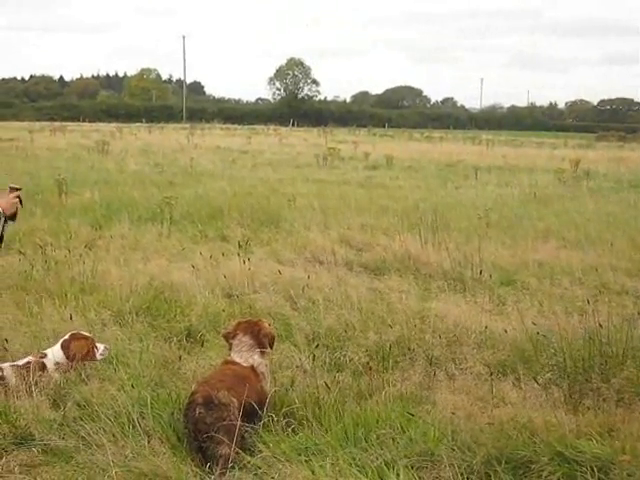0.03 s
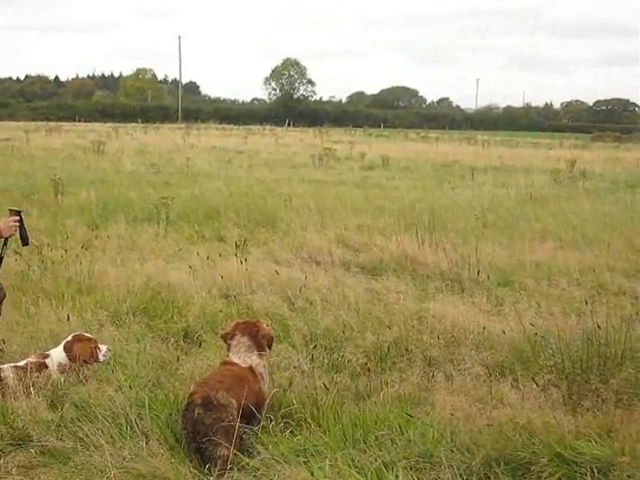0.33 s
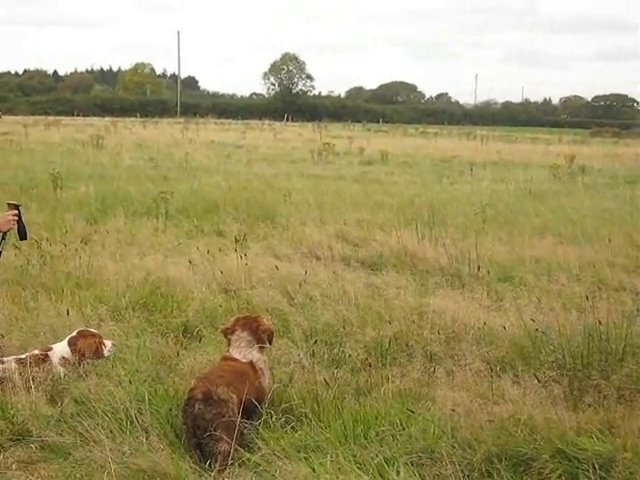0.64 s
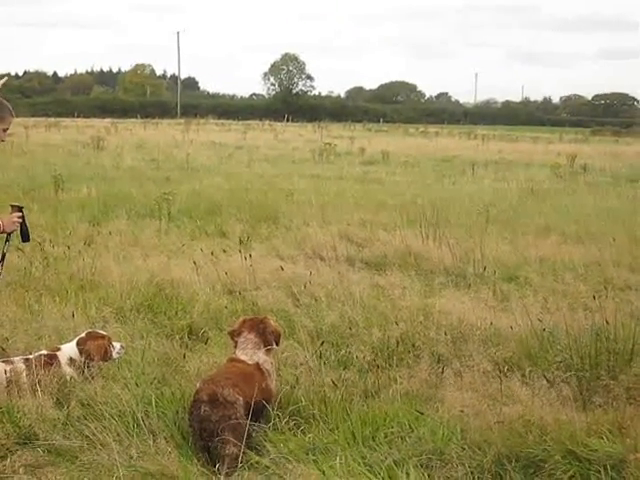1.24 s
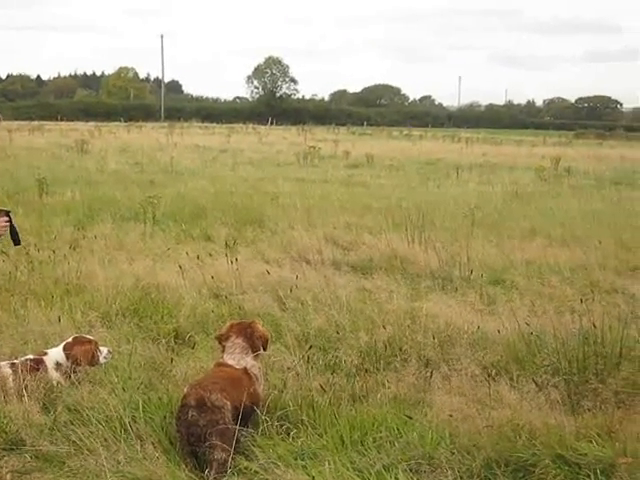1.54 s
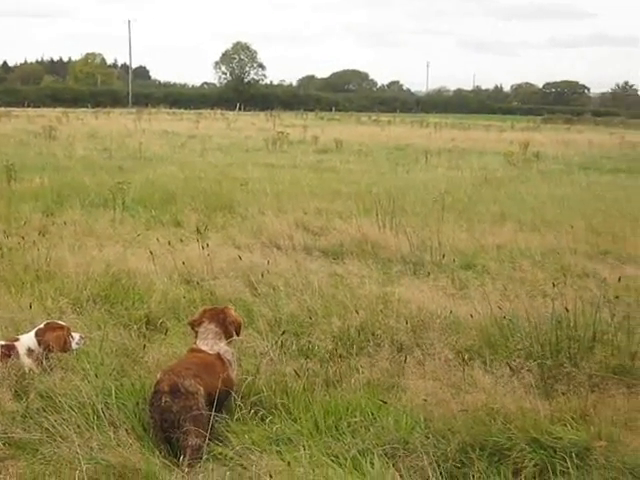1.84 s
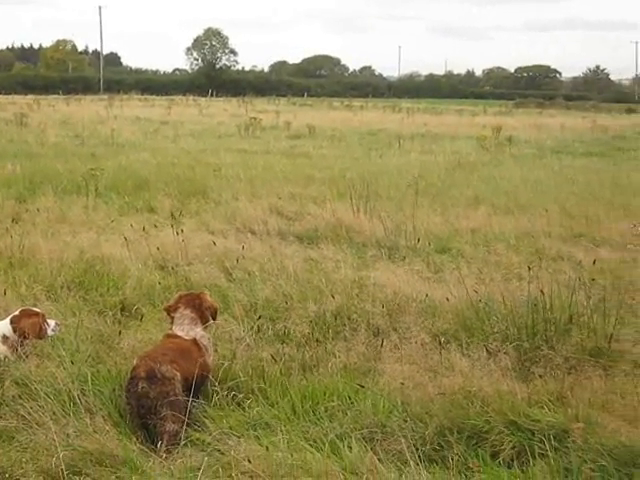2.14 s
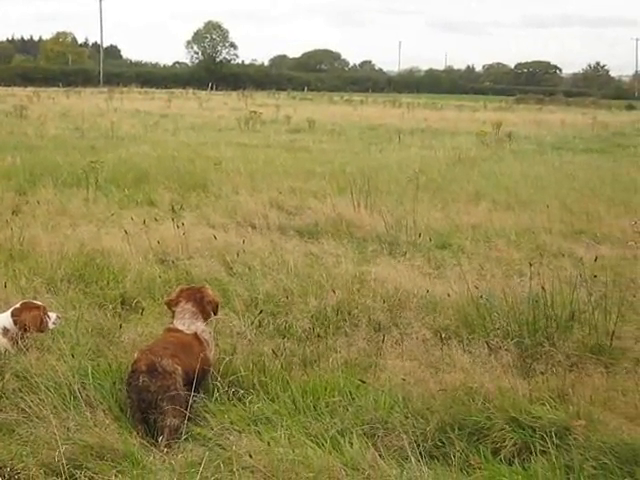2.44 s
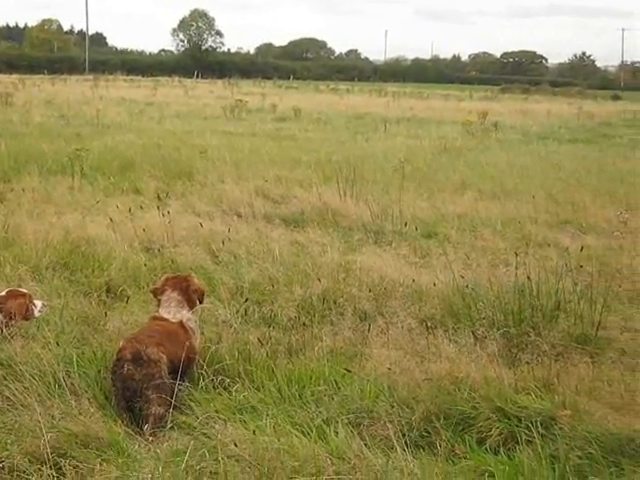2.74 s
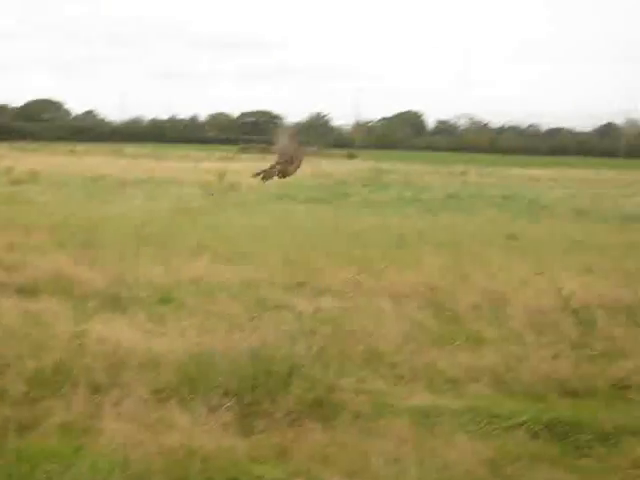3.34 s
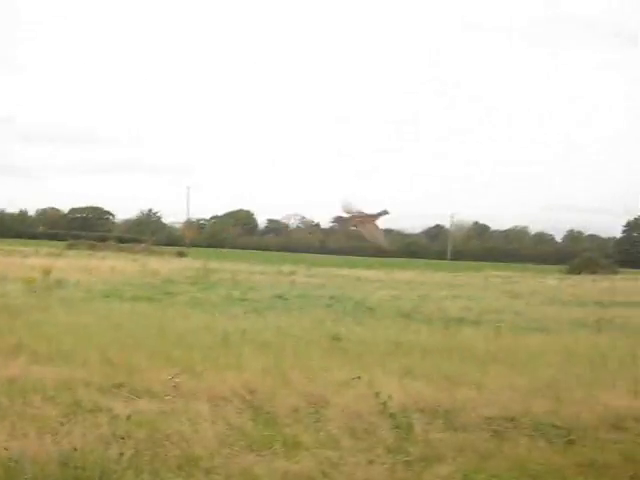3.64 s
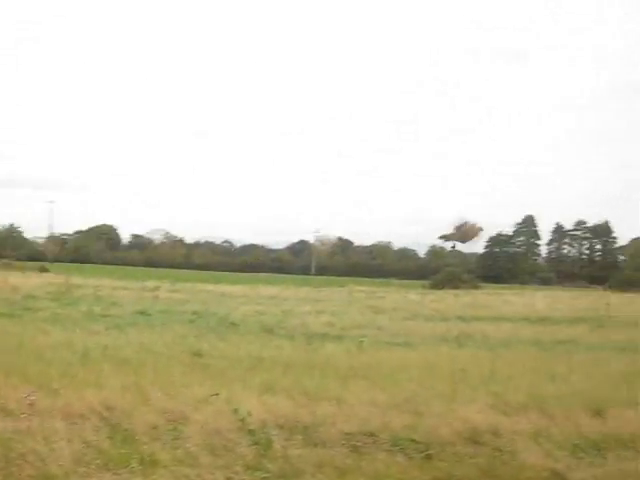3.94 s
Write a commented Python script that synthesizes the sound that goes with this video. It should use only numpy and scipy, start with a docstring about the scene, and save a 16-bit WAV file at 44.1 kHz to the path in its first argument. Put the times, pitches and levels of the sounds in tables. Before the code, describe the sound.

A game bird bursts from grass and whirrs away over a quiet, breezy field.

```python
"""A game bird flushed from grass.

Wind rumbles over a quiet field, a far road murmurs and a small songbird whistles. Near three seconds
a game bird breaks out of the grass: its first strokes slap the stems, then it whirrs away at thirteen
wingbeats a second, each a thump and a swish of displaced air. A small camera with a low sample rate
adds a faint whine, a steady hiss and a gritty top."""
import sys
import numpy as np
from scipy import signal
from scipy.fft import rfft, irfft
from scipy.io import wavfile

SR = 44100
rng = np.random.default_rng(int(sys.argv[2]) if len(sys.argv) > 2 else 0)


def transcribe(signal):
    """Save signal, clipped to [-1, 1], as a 16-bit WAV file at the path in sys.argv[1]."""
    frames = np.atleast_2d(signal).T
    limited = np.clip(frames, -1, 1)
    pcm = np.round(limited * 32767).astype(np.int16)
    wavfile.write(sys.argv[1], SR, pcm)


N = 176400
T = np.arange(N) / SR

# Spectra of the background noises. Each row: frequency in Hz, relative spectral density in dB.
WIND_SPECTRUM = [(15, -10), (28, -13.5), (45, 3), (65, -3), (88, 3.5), (115, -7), (160, -15), (250, -24.5),
                 (500, -31)]
ROAD_SPECTRUM = [(200, -16.5), (350, -15.5), (550, -5.5), (750, -5), (900, 0), (1020, 0), (1250, -7.5),
                 (1700, -19), (3000, -54)]
HISS_SPECTRUM = [(300, 1), (1400, -.5), (2000, -4), (2800, -5.5), (4000, -7.5), (5500, -11)]
# Loudness of the far road. Each row: time in seconds, level in dB.
ROAD_LEVELS = [(0, -46.5), (.45, -47), (.58, -44), (.66, -47.5), (.78, -44), (.95, -46), (1.4, -47.5),
               (2.0, -47), (2.5, -46), (3.0, -47), (4.0, -46)]
# Faint far tones and the songbird's notes. Each row: start in seconds, length in seconds,
# first, middle and last pitch in Hz, level in dB.
FAR_NOTES = [(.03, .23, 335, 322, 300, -54), (.54, .06, 950, 915, 880, -46),
             (.71, .13, 1010, 1035, 990, -47)]
SONG_NOTES = [(.885, 0.017, 4000, 4330, 4660, -48.5), (.9, 0.023, 3914, 3970, 3840, -49.5),
              (.942, .02, 4420, 4050, 3850, -48.5), (.99, 0.019, 4074, 4460, 4940, -47),
              (1.053, 0.017, 3500, 3165, 2970, -48), (1.085, .024, 4235, 3600, 3310, -50.5),
              (1.152, 0.013, 4070, 4220, 4330, -47), (1.238, 0.0268, 4125, 3450, 3000, -50.5),
              (1.304, .02, 3310, 3650, 4280, -49), (1.415, 0.083, 3640, 3630, 3640, -48.5),
              (1.745, 0.058, 3410, 3900, 4057, -44), (1.835, 0.031, 4690, 4640, 4550, -47),
              (1.865, 0.046, 5500, 4780, 5575, -41.5), (1.905, 0.0219, 5375, 5150, 5510, -39.5),
              (1.924, .048, 5300, 4900, 4530, -42), (2.024, 0.019, 4420, 4200, 4200, -47),
              (2.09, 0.058, 3120, 3625, 2690, -42.5), (2.208, 0.026, 4550, 4690, 4480, -49),
              (2.235, 0.096, 4420, 4297, 4270, -43), (2.335, 0.022, 4150, 4380, 4500, -49)]

# The body pushes through grass. Each row: peak time in seconds, level in dB, rise and fall in seconds.
GRASS_BRUSHES = [(2.96, -40.5, 0.0051, 0.014), (2.977, -33.5, .0005, 0.00087), (2.993, -32, 0.013, 0.014),
                 (3.072, -27.5, 0.0031, 0.014), (3.096, -32, 0.00072, 0.0024),
                 (3.1153, -15, 0.00072, 0.00055), (3.139, -39, .001, 0.0024), (3.162, -36.5, .001, .003),
                 (3.237, -37.5, 0.0035, 0.016), (3.541, -35, .005, 0.0038)]
# Rustle of stems and feathers. Each row: time in seconds, level in dB.
RUSTLE_LEVELS = [(2.9, -55.5), (2.97, -46), (3.03, -41.5), (3.1, -39.5), (3.2, -38.5), (3.3, -40),
                 (3.45, -41), (3.58, -41.5), (3.63, -46.5), (3.85, -45), (4.0, -43.5)]
# Spectra of brushing and rustling. Each row: frequency in Hz, relative spectral density in dB.
BRUSH_SPECTRUM = [(200, 2), (600, -10), (1200, -5.5), (2200, -3.5), (3400, -1), (4400, -7), (5500, -7)]
RUSTLE_SPECTRUM = [(150, -2.5), (400, 1.5), (800, 4.5), (1400, 0.5), (2400, 0.5), (3600, -1), (5500, -7.5)]

# Wings strike stems. Each row: start in seconds, strength of the dull smack and the bright crack in dB.
STEM_SLAPS = [(3.042, -16, -36), (3.1046, -20.5, -20), (3.115, -12.5, -34), (3.1162, -3.5, -18),
              (3.1176, -25.5, -15.5), (3.127, -25, -15), (3.1826, -21, -20), (3.1963, -39, -19.5),
              (3.1981, -21, -28), (3.2058, -24, -33)]
# Resonances of a slap. Each row: frequency in Hz, gain in dB, time to decay by 60 dB in seconds.
SMACK_MODES = [(400, -21, 0.017), (870, -10, 0.0056), (1250, -1, 0.0036), (1860, -7, 0.0014)]
CRACK_MODES = [(2280, -9, 0.013), (2550, -1, 0.017)]

# Downstrokes. Each row: peak time in seconds, thump level in dB, thump pitch in Hz,
# thump fall time in seconds, feather swish level in dB.
DOWNSTROKES = [(3.038, -24.5, 588, 0.0029, -37.5), (3.113, -26, 483, 0.0098, -35.5),
               (3.187, -31, 450, 0.0037, -35), (3.264, -24.5, 555, 0.0081, -36),
               (3.3337, -24.5, 556, .0065, -36), (3.409, -18, 430, 0.005, -38),
               (3.483, -28.5, 492, 0.0084, -39), (3.556, -20, 493, 0.0057, -36.5),
               (3.635, -28.5, 430, 0.0038, -37), (3.7097, -22, 555, 0.0031, -42),
               (3.7868, -25, 585, .003, -42), (3.8625, -26.5, 550, 0.0043, -40),
               (3.941, -32, 440, .006, -41)]
# Spectra of the feather swish, the rush of air in the thump and the low push of shoved air.
# Each row: frequency in Hz, relative spectral density in dB.
SWISH_SPECTRUM = [(220, 1.5), (380, 3.5), (700, -1.5), (1200, -2.5), (1900, -1), (2600, -4), (3800, -8),
                  (5500, -12)]
RUSH_SPECTRUM = [(200, -15), (340, -6.5), (450, 6), (620, -8.5), (850, -23.5), (1200, -7), (1600, -14.5)]
PUSH_SPECTRUM = [(25, -3), (45, 3), (90, -1), (130, -6), (180, -15), (250, -36)]


def from_db(db):
    """Amplitude grows tenfold for every 20 dB."""
    return 10 ** (np.asarray(db) / 20)


def level_curve(levels):
    """Gain that moves linearly in decibels between timed levels."""
    return from_db(np.interp(T, *np.transpose(levels)))


def unit_rms(x):
    """Normalisation to unit mean power."""
    return x / np.sqrt(np.mean(x ** 2) + 1e-20)


def filtered(x, kind, hz, order=2):
    """A maximally flat filter passes the "low" or the "high" side of hz."""
    return signal.sosfilt(signal.butter(order, hz, kind, fs=SR, output="sos"), x)


def coloured(x, spectrum):
    """Spectral shaping to unit rms, falling 12 dB an octave above the last point."""
    hz = np.maximum(np.arange(N // 2 + 1) * SR / N, 1)
    points, db = np.transpose(spectrum)
    gain = from_db(np.interp(np.log(hz), np.log(points), db)) / np.maximum(hz / points[-1], 1) ** 2
    return unit_rms(irfft(rfft(x) * gain, N))


def noise(spectrum):
    """White noise takes on the spectrum of its filter."""
    return coloured(rng.standard_normal(N), spectrum)


def drift(rate_hz):
    """Low-passed noise wanders at random with unit rms."""
    hz = np.arange(N // 2 + 1) * SR / N
    return unit_rms(irfft(rfft(rng.standard_normal(N)) / (1 + (hz / rate_hz) ** 2), N))


def swell(peak_s, rise_s, fall_s):
    """A hyperbolic secant envelope: a rounded peak with exponential flanks."""
    t = T - peak_s
    distance = np.abs(t) / np.where(t < 0, rise_s, fall_s)
    return 1 / np.cosh(np.minimum(distance * np.pi / 2, 20))


def whistles(notes):
    """Frequency modulation: each nearly pure note glides through three pitches, wavering slightly."""
    out = np.zeros(N)
    waver = 1 + .004 * drift(89)
    for start, length, first, middle, last, db in notes:
        progress = np.linspace(0, 1, int(length * SR))
        span = slice(int(start * SR), int(start * SR) + len(progress))
        glide = np.polyfit([0, .5, 1], [first, middle, last], 2)
        hz = np.polyval(glide, progress) * waver[span]
        envelope = np.sqrt(np.abs(np.sin(np.pi * progress)))
        out[span] += from_db(db) * envelope * np.sin(2 * np.pi * np.cumsum(hz) / SR)
    return out * from_db(1.5 * drift(44))  # the level flickers


def field():
    """Superposition of wind rumble, the wash of a far road, a light hiss and a few faint far tones."""
    wind = from_db(-41 + .5 * drift(12)) * noise(WIND_SPECTRUM)
    road = level_curve(ROAD_LEVELS) * from_db(.5 * drift(7.3)) * noise(ROAD_SPECTRUM)
    hiss = from_db(-55.3) * noise(HISS_SPECTRUM)
    return wind + road + hiss + whistles(FAR_NOTES)


def songbird(echo_db=-6, echo_rise_s=.02, echo_t60_s=.75):
    """Diffuse reflection from the hedges trails a far song with a thin echo."""
    song = whistles(SONG_NOTES)
    t = T[:SR]
    envelope = from_db(-60 * t / echo_t60_s) * np.minimum(t / echo_rise_s, 1)
    reflections = rng.standard_normal(SR) * envelope
    echo = signal.fftconvolve(song, reflections / np.linalg.norm(reflections))[:N]
    return song + from_db(echo_db) * echo


def stem_ticks(spectrum, ticks_per_s=3500, spread_db=1.5):
    """Shot noise: dry stems tick densely, at random times and with uneven strength."""
    sizes = from_db(spread_db * np.minimum(rng.exponential(1, N), 4))
    signs = rng.choice([-1, 1], N)
    ticking = rng.random(N) < ticks_per_s / SR
    return coloured(sizes * signs * ticking, spectrum)


def grass():
    """Many small contacts merge into noise as stems are brushed aside and rustle under the rising bird."""
    brushes = sum(from_db(db) * swell(peak, rise, fall) for peak, db, rise, fall in GRASS_BRUSHES)
    brushing = brushes * stem_ticks(BRUSH_SPECTRUM)
    rustle = level_curve(RUSTLE_LEVELS) * stem_ticks(RUSTLE_SPECTRUM)
    return brushing + rustle


def ring(impulses, modes):
    """Impulses excite resonant modes, each an exponentially damped sinusoid."""
    out = np.zeros(N)
    for hz, db, t60 in modes:
        radius = from_db(-60 / (t60 * SR))
        angle = 2 * np.pi * hz / SR
        feedback = [1, -2 * radius * np.cos(angle), radius ** 2]
        out += from_db(db) * signal.lfilter([0, np.sin(angle)], feedback, impulses + 1e-18)
    return out


def contacts(starts, levels_db, scatter_db=-28, scatter_s=.004):
    """Each impact is an impulse followed by a decaying scatter of smaller contacts."""
    impulses = np.zeros(N)
    t = T[:SR // 20]
    for start, db in zip(starts, levels_db):
        contact = from_db(scatter_db) * rng.standard_normal(len(t)) * np.exp(-t / scatter_s)
        contact[0] = -1
        onset = int(start * SR)
        impulses[onset:onset + len(t)] += from_db(db) * contact
    return impulses


def wing_slaps():
    """Impact excitation: wings striking stems ring a dull smack and a bright crack."""
    starts, smack_db, crack_db = np.transpose(STEM_SLAPS)
    smack = ring(contacts(starts, smack_db), SMACK_MODES)
    crack = ring(contacts(starts, crack_db), CRACK_MODES)
    slaps = filtered(smack - crack, "high", hz=214)
    return filtered(slaps, "low", hz=5000)


def wingbeats(roughness=.29, sag_per_s=8, push_s=.026, flick_s=.0055, flick_lag_s=.02, wake_s=.02):
    """Displaced air radiates sound: each stroke gives a falling thump, a rush, a low push and a swish."""
    thumps, swish, rush, push = np.zeros((4, N))
    flutter = 1 + roughness * drift(100)
    phase_wobble = 2 * roughness * drift(100)
    mean_db = np.mean(DOWNSTROKES, axis=0)[1]
    for peak, db, hz, fall, swish_db in DOWNSTROKES:
        sagging_hz = hz * np.exp(-sag_per_s * np.clip(T - peak, -.04, .04))
        phase = 2 * np.pi * np.cumsum(sagging_hz) / SR
        envelope = from_db(db) * swell(peak, .72 * fall, fall)
        thumps += envelope * flutter * np.sin(phase - phase[int(peak * SR)] + phase_wobble)
        push_db = -36.5 + .54 * (db - mean_db)  # a harder stroke shoves more air
        push += from_db(push_db) * swell(peak + push_s / 2, push_s, push_s)
        flick = swell(peak + flick_lag_s, flick_s, flick_s)  # the wing turns at the end of the stroke
        swish += from_db(swish_db) * (swell(peak, rise_s=.0073, fall_s=.0096) + from_db(-2.5) * flick)
        wake = from_db(db - 27) * swell(peak, fall, wake_s)  # eddies die away behind the stroke
        rush += from_db(-10) * envelope + from_db((db + mean_db) / 2 - 16.5) * flick + wake
    strokes = thumps + swish * noise(SWISH_SPECTRUM) + rush * noise(RUSH_SPECTRUM)
    return filtered(strokes, "high", hz=270, order=6) + push * noise(PUSH_SPECTRUM)


def scene():
    """Sound pressures add: the fleeing bird, the songbird and the open field share one channel."""
    return (wingbeats() + wing_slaps() + grass() + songbird() + field())[None]


def record(dry, whine_hz=4801, whine_db=-56.5, step=1 / 128, hold_samples=4, cutoff_hz=15750):
    """The camera whines faintly; quantisation adds hiss, and sample-and-hold images add gritty treble."""
    band_limited = filtered(dry, "low", hz=SR / hold_samples / 2, order=10)
    whine = from_db(whine_db) * np.sin(2 * np.pi * whine_hz * T)
    quantised = step * np.round((band_limited + whine) / step)
    held = np.repeat(quantised[:, ::hold_samples], hold_samples, axis=1)[:, :N]
    return signal.sosfilt(signal.ellip(12, .1, 80, cutoff_hz, fs=SR, output="sos"), held)


dry = scene()
out = record(dry)
transcribe(out)
```